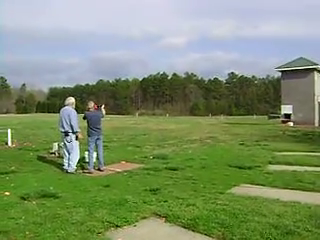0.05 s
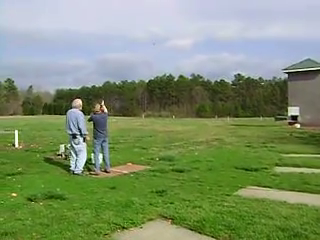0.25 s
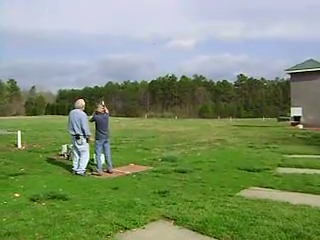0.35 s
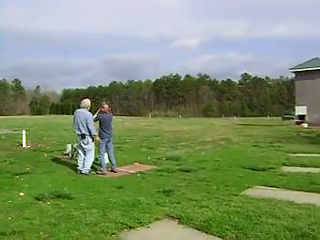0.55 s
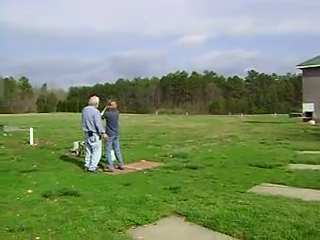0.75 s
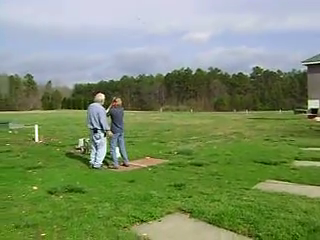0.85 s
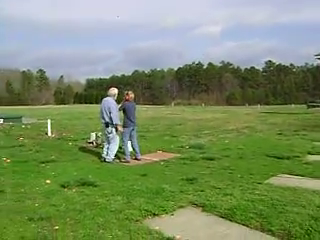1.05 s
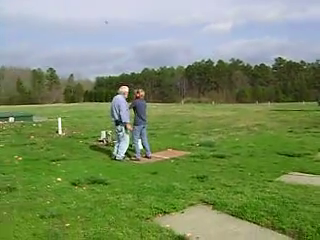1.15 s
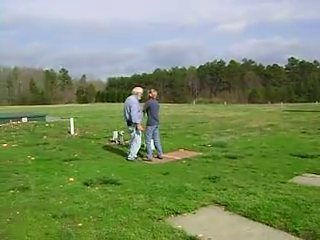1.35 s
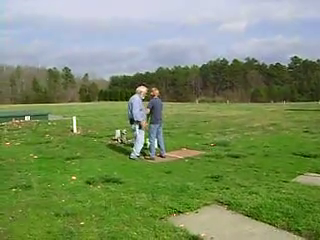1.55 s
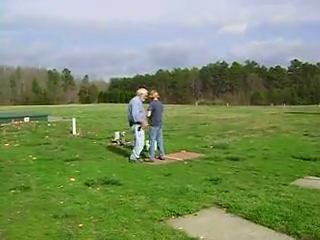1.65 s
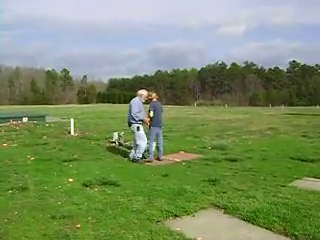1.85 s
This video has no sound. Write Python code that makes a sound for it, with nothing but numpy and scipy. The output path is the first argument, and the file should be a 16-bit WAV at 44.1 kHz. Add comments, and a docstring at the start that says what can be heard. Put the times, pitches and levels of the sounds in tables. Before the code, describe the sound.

A single shotgun blast goes off in an open field, a few metres from a small microphone that overloads. Echoes rattle back quickly, then a duller roll returns from the distant trees and fades over faint outdoor air.

```python
"""One shotgun blast on an open field, a few metres from a small camera whose microphone overloads.
The hammer clicks just before the charge fires. The report comes back as a rattle of separate echoes
over dense scatter from the ground and buildings, with thuds of bass. A second later the edge of the
wood returns a long, duller roll. Faint outdoor air lies beneath, with a flutter before the shot
and one small tick near the end."""
import sys
import numpy as np
from scipy import signal
from scipy.fft import rfft, irfft
from scipy.io import wavfile

SR = 44100
rng = np.random.default_rng(int(sys.argv[2]) if len(sys.argv) > 2 else 0)


def generate_wav(sig):
    """Save sig (samples, or channels by samples) to the path in sys.argv[1] as 16-bit PCM at SR."""
    pcm = np.round(np.clip(np.atleast_2d(sig).T, -1, 1) * 32767).astype(np.int16)
    wavfile.write(sys.argv[1], SR, pcm)


N = 83790
T = np.arange(N) / SR
GRID_HZ = abs(np.fft.fftfreq(4096, 1 / SR))
TREBLE_SHELF = np.interp(GRID_HZ, [1070, 2020], [0, 1])

# Full-bodied colour of near reflections. Each row: frequency in Hz, level in dB.
NEAR_COLOUR = [(40, -19), (150, -9.5), (330, -5.5), (600, -6.5), (850, -5.5), (1120, -1), (1550, -8),
               (2150, -5), (3000, -10.5), (5200, -13.5)]
# Thin colour of far echoes and of the hammer. Each row: frequency in Hz, level in dB.
THIN_COLOUR = [(40, -37), (450, -20.5), (700, -8.5), (900, -3.5), (1080, 1), (1220, 1.5), (1530, -16.5),
               (1850, -9.5), (2350, -13), (2700, -22), (5200, -19)]


def amp(db):
    """Decibels to gain."""
    return 10 ** (np.asarray(db) / 20)


def curve(points):
    """Gain over time from (s, dB) points, silent outside them."""
    times, db = np.transpose(points)
    return amp(np.interp(T, times, db, left=-200, right=-200))


def spectrum(points):
    """Level in dB on the filter grid from (Hz, dB) points, cut off above the microphone's band."""
    top_hz, stop_hz = 5006, 6510
    hz, db = np.transpose(points)
    cut_db = 45 * np.clip((GRID_HZ - top_hz) / (stop_hz - top_hz), 0, 1.3) ** 2
    return np.interp(np.log(GRID_HZ + 1), np.log(hz), db) - cut_db


def colour(x, shape_db):
    """Causal filter with the given spectrum; the result has an rms of one."""
    minimum_phase = np.exp(np.conj(signal.hilbert(np.log(amp(shape_db)))))
    taps = np.fft.ifft(minimum_phase).real
    filtered = signal.fftconvolve(x, taps[:len(taps) // 2])[:len(x)]
    return filtered / np.sqrt(np.mean(filtered ** 2) + 1e-20)


def grainy(depth_db=3.5, grain_s=0.0018):
    """Noise whose strength jumps every few milliseconds, as many small reflections do."""
    steps = np.arange(0, 2, grain_s)
    strengths = np.clip(rng.standard_normal(N)[:len(steps)], -2, 2)
    return rng.standard_normal(N) * amp(depth_db * np.interp(T, steps, strengths))


def burst(start_s, db, length_s, shape_db):
    """A tight cluster of pulses of random sign, placed at start_s in an otherwise silent track."""
    rise_s, decay_s, size = 0.00048, 0.00065, 4096
    t = np.arange(size) / SR
    envelope = np.minimum(t / rise_s, 1) * np.exp(-np.maximum(t - length_s, 0) / decay_s)
    cluster = rfft(rng.standard_normal(size) * envelope)
    whitened = irfft(cluster / (abs(cluster) + 1e-9), size) * envelope
    gain = amp(db) * np.sqrt((length_s + decay_s) * SR / size)  # db is the level over its length
    sound = gain * colour(whitened, shape_db)
    return np.pad(sound, (round(start_s * SR), N))[:N]


def farness(arrival_s):
    """0 for early, full-bodied reflections, 1 for late, thin ones."""
    near_until_s, far_from_s = 0.447, 0.6
    return np.clip((arrival_s - near_until_s) / (far_from_s - near_until_s), 0, 1)


def air():
    """Faint, steady air over the open field."""
    # Colour of the air. Each row: frequency in Hz, level in dB.
    air_colour = [(25, -9), (80, -14), (135, -2.5), (200, -7), (300, 2.5), (450, -6), (800, -1.5),
                  (1100, -3), (1500, -10), (2200, -14.5), (3200, -19.5), (5200, -22.5)]
    return amp(-40.5) * colour(rng.standard_normal(N), spectrum(air_colour))


def flutter():
    """A faint, grainy flutter before the shot."""
    # Its swells. Each row: time in seconds, level in dB.
    swells = [(.03, -67), (.06, -39), (.076, -38.5), (.105, -36.5), (.14, -40.5), (.16, -43), (.177, -36),
              (.197, -50), (.22, -57)]
    # Its narrow colour. Each row: frequency in Hz, level in dB.
    flutter_colour = [(200, -32), (750, -31), (980, -6), (1120, 4.5), (1260, -5), (1450, -14),
                      (1850, -10.5), (3200, -21)]
    return curve(swells) * colour(grainy(), spectrum(flutter_colour))


def hammer():
    """The hammer falls with a click just before the charge fires."""
    return burst(start_s=0.2, db=-35, length_s=0.0028, shape_db=spectrum(THIN_COLOUR))


def muzzle_blast():
    """The blast from a few metres away: a quick rise, a short hold and a steep fall."""
    # Colour of the blast. Each row: frequency in Hz, level in dB.
    blast_colour = [(40, -28), (100, -20), (180, -8), (330, 1), (560, 2), (780, -6.5), (1100, 2),
                    (1450, -10.5), (2350, 0), (3300, -7.5), (5200, -12.5)]
    start_s, rise_s, hold_s, decay_s = 0.2288, 0.0033, 0.011, 0.0048
    t = np.maximum(T - start_s, 0)
    envelope = np.minimum(t / rise_s, 1) ** 1.6 * np.exp(-np.maximum(t - hold_s, 0) / decay_s)
    return amp(-0.5) * envelope * colour(rng.standard_normal(N), spectrum(blast_colour))


def scatter():
    """Dense reflections off the ground and buildings, thinner as they come from farther out."""
    # Strength of the scatter. Each row: time in seconds, level in dB.
    swells = [(.232, -23), (.255, -14.5), (.275, -14), (.345, -7.5), (.36, -22.5), (.376, -12.5),
              (.428, -10), (.445, -18), (.458, -11), (.51, -11.5), (.55, -15.5), (.595, -14), (.625, -20),
              (.68, -19.5), (.73, -27.5), (.785, -19), (.845, -27), (.885, -27.5), (.905, -25.5),
              (.945, -35), (1.2, -32.5)]
    # Colour of the late scatter. Each row: frequency in Hz, level in dB.
    late_colour = [(40, -28), (130, -11.5), (260, -14.5), (480, -14.5), (700, -10), (900, -4.5), (1060, -1),
                   (1260, 1), (1530, -12), (2100, -8.5), (3100, -16.5), (5200, -19.5)]
    far_share = farness(T)
    near = np.sqrt(1 - far_share) * colour(grainy(), spectrum(NEAR_COLOUR))
    far = np.sqrt(far_share) * colour(grainy(), spectrum(late_colour))
    return curve(swells) * (near + far)


def echoes():
    """Separate echoes rattle back, each ringing at its own pitch, the far ones thinner."""
    # Each row: start in seconds, level in dB, length in seconds, treble in dB, resonance in Hz.
    arrivals = [(0.2419, -11, 0.0036, -6, 560), (.249, -15, 0.0032, -3, 1100),
                (0.259, -9.5, 0.012, 0.5, 1130), (.274, -13, 0.0047, 0, 2270),
                (.281, -6.5, 0.0096, 8, 2760), (0.2918, -5, 0.0035, 6, 2250),
                (.3035, -3.5, 0.0049, 0, 1210), (0.311, -2, .0105, -3.5, 1310),
                (0.333, -4, 0.013, -5, 1190), (0.347, -5.5, 0.0082, -2.5, 1040),
                (0.363, -6, 0.011, 1, 1900), (0.3728, -5, 0.0086, 1.5, 2000),
                (.382, -5, 0.0081, -1.5, 2100), (0.396, -8.5, 0.013, 0, 2000), (0.41, -7, 0.0055, -1, 890),
                (0.4183, -1, 0.0095, -4, 960), (0.433, -9, 0.0051, -2, 1070), (.449, -6, 0.0039, 3, 1170),
                (.454, -5, 0.0056, 8, 2170), (.463, -9.5, 0.0034, 3, 1150), (.477, -15, 0.0024, 14, 1150),
                (0.484, -16.5, 0.0096, 8, 2170), (0.503, -16, 0.0047, 13, 2130),
                (0.5304, -6.5, 0.0023, -3, 1160), (0.5359, -7, 0.0052, -2.5, 1170),
                (0.5553, -2.5, 0.0032, 3.5, 1050), (.5598, -2.5, .0058, 1, 1130),
                (0.5692, -6, 0.0073, 5, 1070), (0.5773, -4.5, 0.008, 0.5, 1040),
                (0.586, -4.5, 0.0029, -11, 890), (0.606, -21.5, 0.014, 10, 1190),
                (0.6333, -5.5, 0.0014, -6, 1040), (0.6431, -3.5, 0.0028, -1.5, 990),
                (0.6524, -6, 0.0015, -1, 1100), (.669, -5.5, 0.0023, -1, 1130),
                (0.6735, -11.5, 0.0032, 1, 1260), (0.686, -22, 0.0058, 9, 1130),
                (0.747, -21, .0014, 5, 1100), (.7558, -15.5, .0028, 7, 1150),
                (0.7812, -6, 0.00257, 4, 1180), (0.796, -15, 0.0036, -15, 1110),
                (0.803, -12, 0.0061, -1, 846), (.8188, -7, .0013, 4, 1900), (.827, -16, 0.0028, -6, 1050),
                (0.864, -14.5, 0.0017, -2, 1130), (0.8906, -17.5, .0062, -2.5, 1890),
                (1.001, -20.5, 0.0051, -0.5, 1940), (1.026, -24.5, 0.0088, 2.5, 1100),
                (1.042, -22.5, .002, 3, 1100), (1.065, -24, .0023, -11, 1050)]
    half_width_hz, ring_near_db, ring_far_db = 170, 6.5, 3.5
    near_db, thin_db = spectrum(NEAR_COLOUR), spectrum(THIN_COLOUR)
    out = np.zeros(N)
    for start_s, db, length_s, treble_db, ring_hz in arrivals:
        far_share = farness(start_s)
        body_db = near_db + far_share * (thin_db - near_db)
        peak_db = ring_near_db + far_share * (ring_far_db - ring_near_db)
        ring_db = peak_db / (1 + ((GRID_HZ - ring_hz) / half_width_hz) ** 2)
        out += burst(start_s, db, length_s, body_db + treble_db * TREBLE_SHELF + ring_db)
    return out


def thuds():
    """Dull pushes of air among the echoes, each around one low frequency."""
    # Each row: start in seconds, level in dB, length in seconds, centre in Hz.
    pushes = [(.277, -13.5, 0.014, 303), (.287, -25, 0.0074, 150), (.3355, -3, 0.005, 163),
              (.414, -18, .006, 135), (.453, -32, 0.045, 99), (.559, -20, 0.012, 217),
              (.581, -24, 0.01, 56), (.646, -15, 0.0027, 474), (.662, -32, 0.013, 112),
              (.779, -36, 0.0039, 130), (0.819, -31.5, .0076, 111), (.893, -39, .012, 130)]
    octaves = np.arange(-4, 6)
    shape_db = np.where(octaves > 0, -11 * octaves, 5 * octaves)  # steeper above the centre
    out = np.zeros(N)
    for start_s, db, length_s, centre_hz in pushes:
        points = np.transpose([centre_hz * 2. ** octaves, shape_db])
        out += burst(start_s, db, length_s, spectrum(points))
    return out


def wood_roll():
    """The distant tree line returns a grainy roll; the nearest trees answer brightest, then it dulls."""
    # Strength of the roll. Each row: time in seconds, level in dB.
    swells = [(1.06, -42), (1.10, -25), (1.137, -23.5), (1.168, -30.5), (1.195, -16), (1.212, -20),
              (1.235, -17), (1.28, -18.5), (1.33, -23.5), (1.40, -19.5), (1.48, -21), (1.62, -24),
              (1.9, -31.5)]
    # Colour of the wood's answer. Each row: frequency in Hz, level in dB.
    wood_colour = [(40, -18), (150, -19.5), (450, -12), (750, 0), (980, 1), (1400, -7.5), (1700, -7.5),
                   (2000, -13), (2300, -7.5), (2850, -17.5), (5200, -19)]
    # Sharp returns within the roll. Each row: start in seconds, level in dB, length in seconds.
    sharp_returns = [(1.111, -23, .004), (1.1866, -12, 0.0012), (1.1934, -11.5, .0022),
                     (1.2207, -11, 0.0029), (1.2288, -10.5, 0.0044), (1.242, -22, .004),
                     (1.261, -14.5, 0.0021), (1.299, -18, 0.0042), (1.3478, -15.5, 0.0021),
                     (1.359, -20.5, 0.0035), (1.382, -12, 0.002), (1.395, -14.5, 0.0026),
                     (1.411, -13, 0.0026), (1.42, -18.5, 0.0022), (1.4575, -19.5, 0.0033),
                     (1.491, -15.5, 0.0021), (1.665, -21.5, 0.0058), (1.813, -24.5, 0.0024)]
    onset_s, dulling_s, treble_db = swells[0][0], 0.26, 4
    wood_db = spectrum(wood_colour)
    reflections = grainy(depth_db=3)
    dull = colour(reflections, wood_db)
    bright = colour(reflections, wood_db + treble_db * TREBLE_SHELF)
    bright_share = np.exp(-(np.maximum(T - onset_s, 0) / dulling_s) ** 2)
    out = curve(swells) * (dull + bright_share * (bright - dull))
    for start_s, db, length_s in sharp_returns:
        out += burst(start_s, db, length_s, wood_db)
    return out


def tick():
    """One small, bright tick late in the roll."""
    # Colour of the tick. Each row: frequency in Hz, level in dB.
    tick_colour = [(500, -33), (2300, -15), (3020, 3), (3450, -8.5), (3900, 5), (4270, -1), (4650, 1),
                   (5400, 1)]
    return burst(start_s=1.7597, db=-21.5, length_s=0.0023, shape_db=spectrum(tick_colour))


def scene():
    """Everything that reaches the one microphone."""
    gun = muzzle_blast() + hammer()
    reflections = scatter() + echoes() + thuds() + wood_roll()
    return (gun + reflections + air() + flutter() + tick())[None]


def record(dry):
    """The camera's input stage flattens the peaks; its colour and band limit follow."""
    # The camera's response after the overload. Each row: frequency in Hz, gain in dB.
    response = [(5000, 0), (5700, -2), (6300, -7.5), (7200, -5.5), (9000, -1.5), (16000, 1)]
    ceiling, hardness, edge_hz = 0.69, 10.6, 16000
    clipped = dry / (4 + abs(dry / ceiling) ** hardness) ** (1 / hardness)
    hz, db = np.transpose(response)
    gain = amp(np.interp(np.fft.rfftfreq(2 * N, 1 / SR), hz, db))
    coloured = irfft(rfft(clipped, 2 * N) * gain)[:, :N]
    lowpass = signal.firwin(511, edge_hz, window=("kaiser", 9), fs=SR)
    return signal.oaconvolve(coloured, lowpass[None], "same")


dry = scene()
out = record(dry)
generate_wav(out)
```